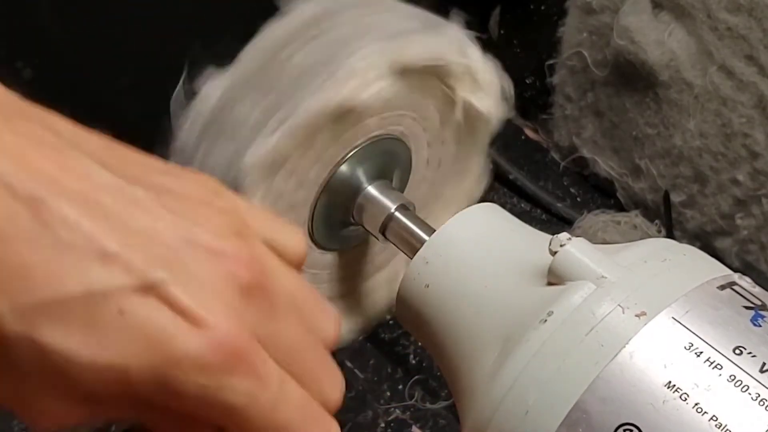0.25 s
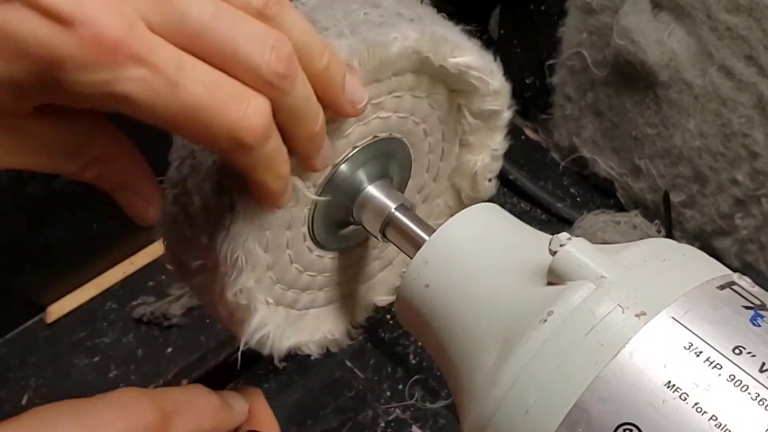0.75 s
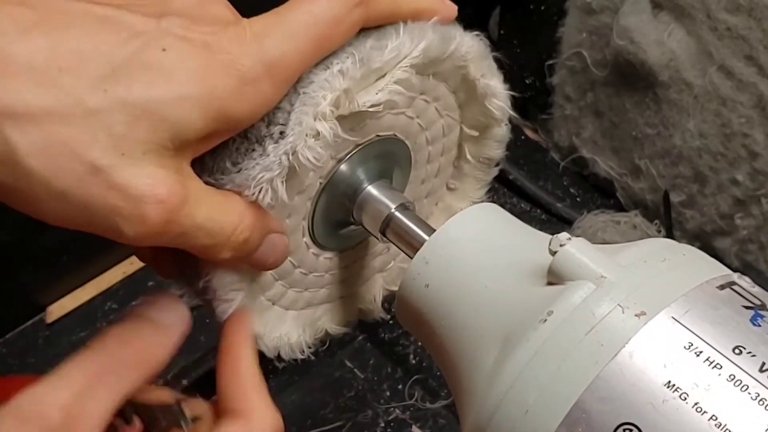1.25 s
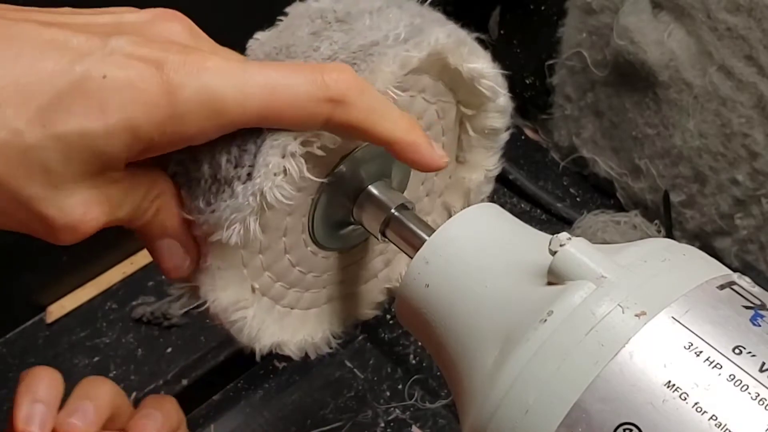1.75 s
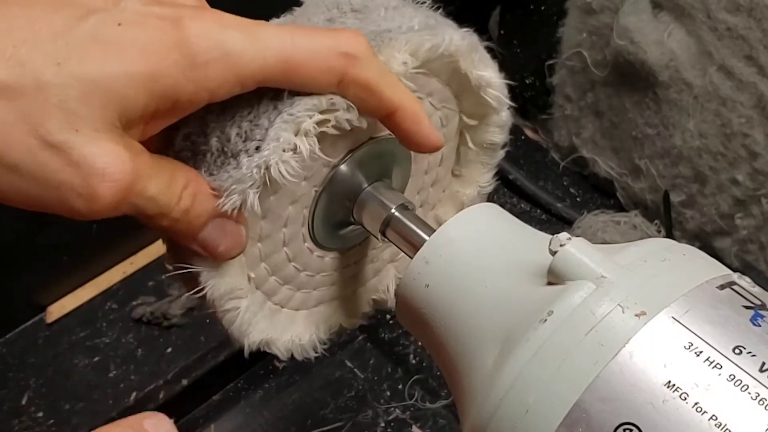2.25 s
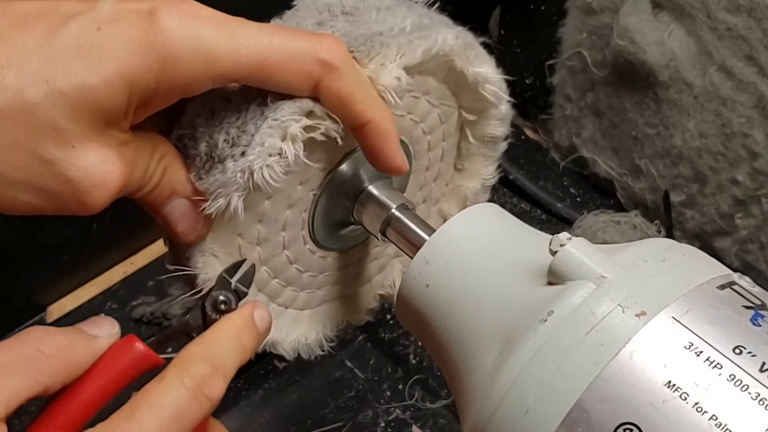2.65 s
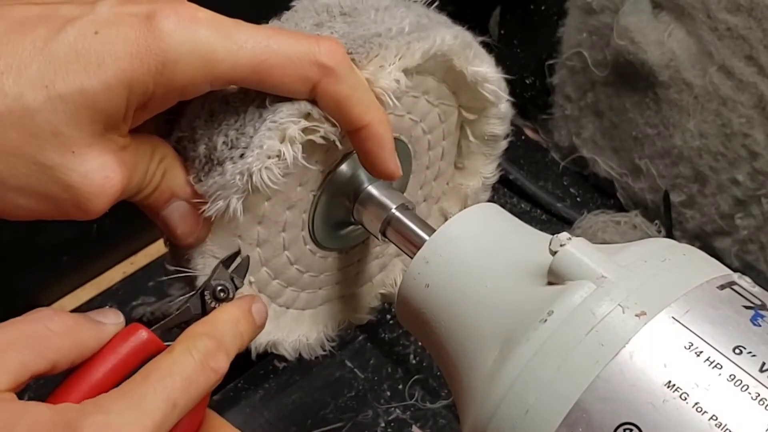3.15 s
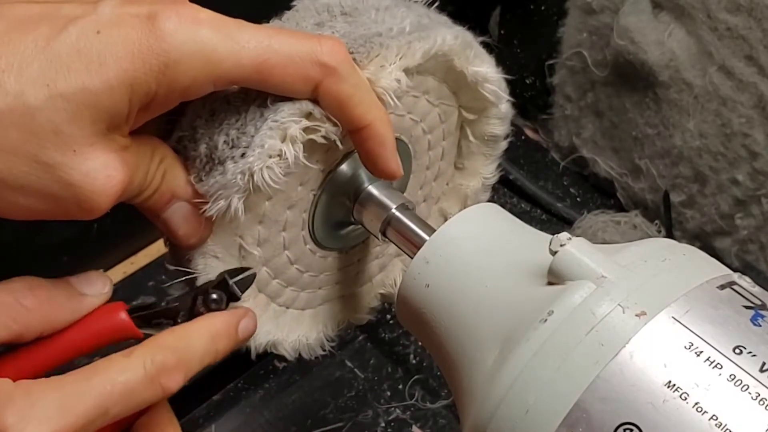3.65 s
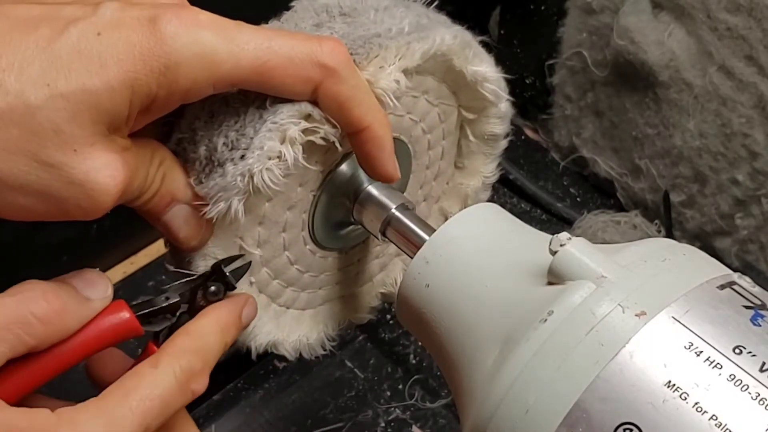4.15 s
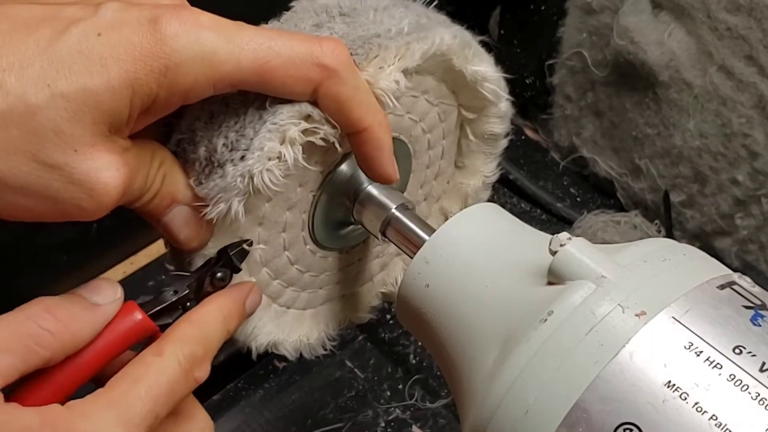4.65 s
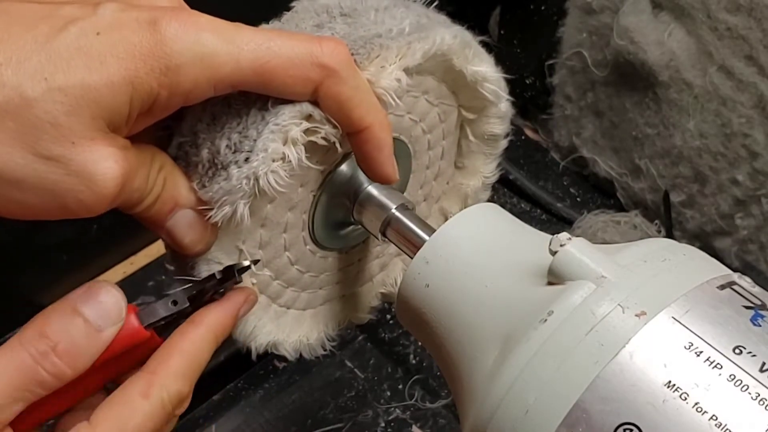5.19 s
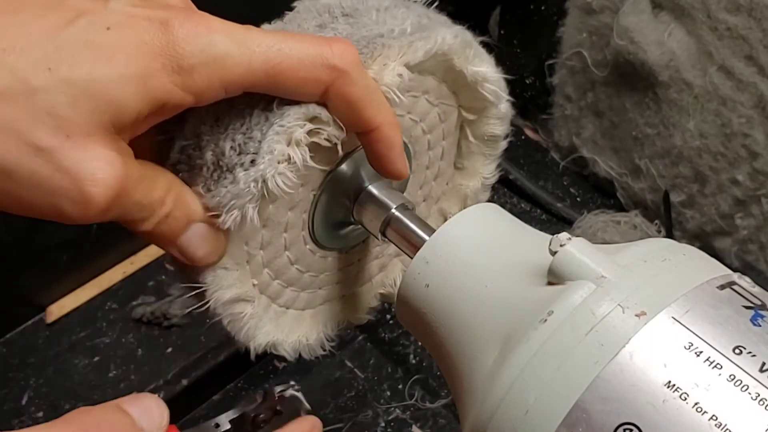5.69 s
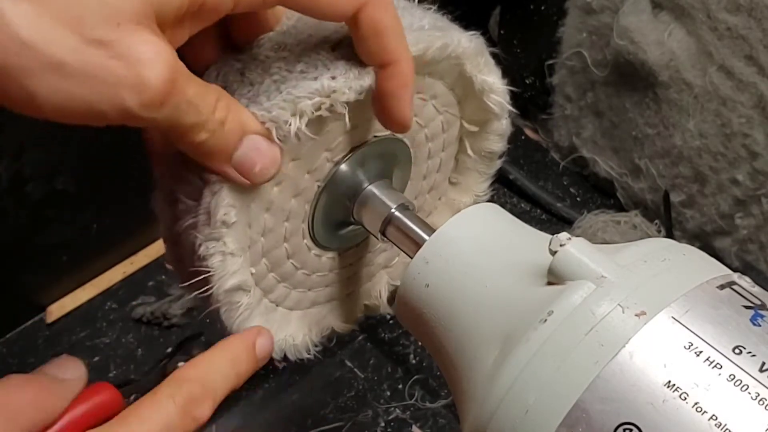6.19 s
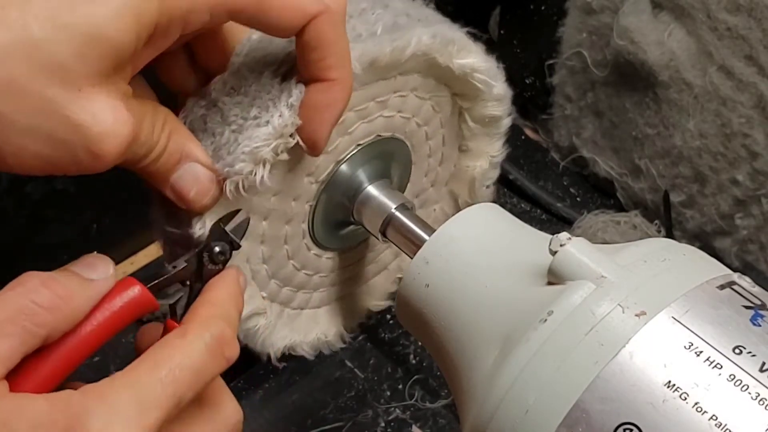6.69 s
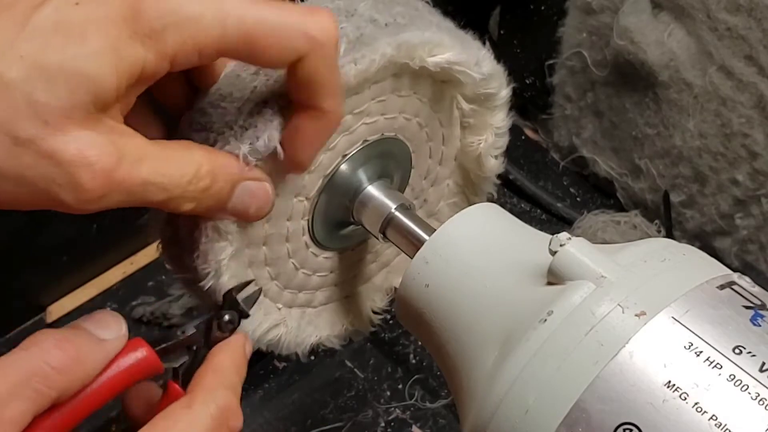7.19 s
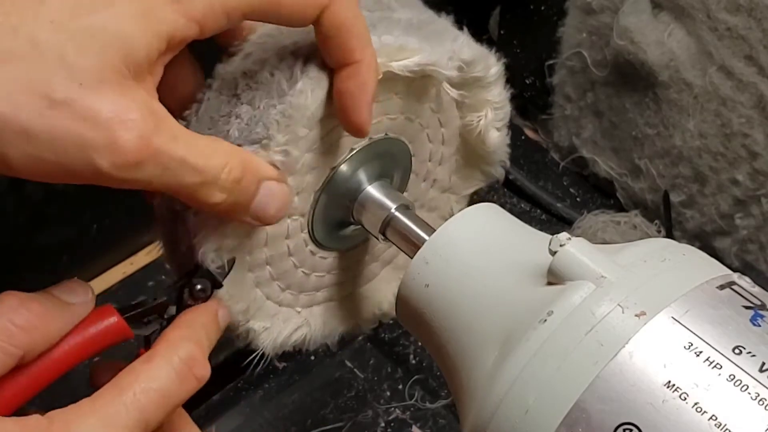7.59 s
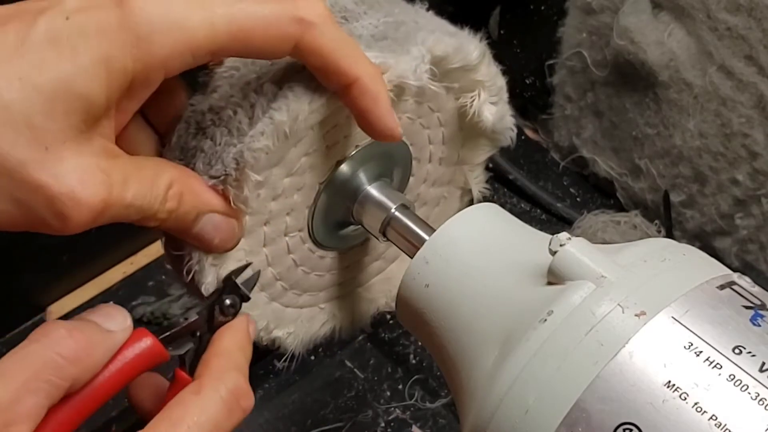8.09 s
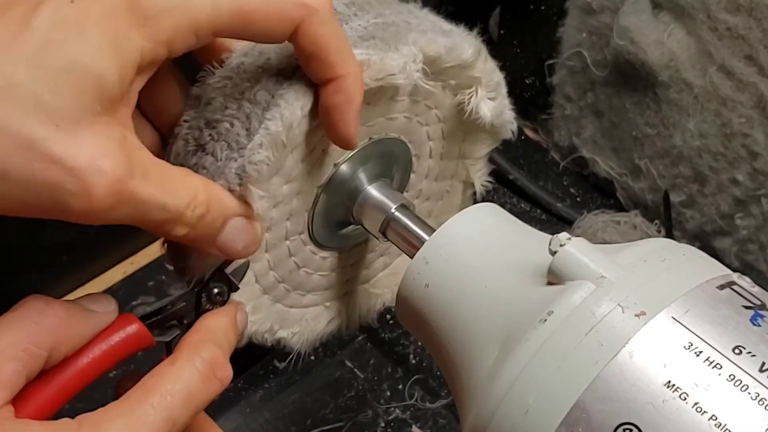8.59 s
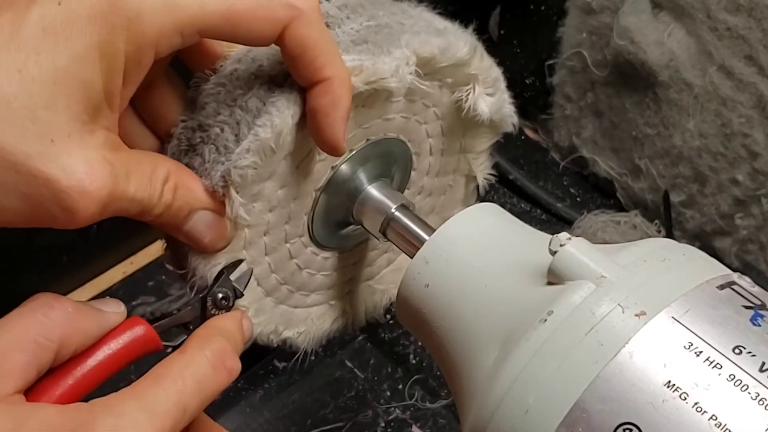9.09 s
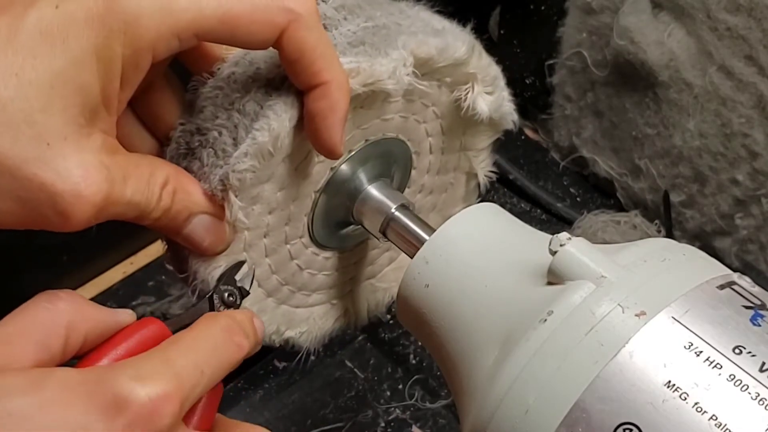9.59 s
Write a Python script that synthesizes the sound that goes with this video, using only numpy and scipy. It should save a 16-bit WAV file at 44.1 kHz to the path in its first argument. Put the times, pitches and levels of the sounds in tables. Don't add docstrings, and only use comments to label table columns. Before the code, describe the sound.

A gusty low machine hum runs throughout; one hard metallic snip rings out early, followed by a sleeve rustle and faint dull bumps.

```python
import sys
import numpy as np
from scipy import signal
from scipy.fft import rfft, irfft
from scipy.io import wavfile
from scipy.ndimage import uniform_filter1d

SR = 44100
rng = np.random.default_rng(int(sys.argv[2]) if len(sys.argv) > 2 else 0)


def voltage_ratio(decibels):
    exponent = np.asarray(decibels, float) / 20
    return 10 ** exponent


def wav_out(sig):
    wavfile.write(sys.argv[1], SR, np.round(np.clip(np.atleast_2d(sig).T, -1, 1) * 32767).astype(np.int16))


N = 433944
TIME = np.arange(N) / SR
HZ = np.maximum(np.fft.rfftfreq(N, 1 / SR), 1)
TOP_HZ = 15720

# f/Hz, density/dB per Hz
RUMBLE_SPECTRUM = [(22, -23), (34, -16), (42, -25), (50, 1.5), (58, -11), (66, 6.5), (72, -5), (80, 7),
                   (90, -3.5), (100, -4.5), (112, -9)]
# t/s, level over mean/dB, half-length/s
RUMBLE_SWELLS = [(.05, 5, .033), (.23, 10, 0.025), (.73, 4, 0.088), (1.06, 5, .04), (1.34, 4.5, 0.11),
                 (1.93, -4.9, .12), (2.14, 6.5, 0.036), (2.6, -5.9, .04), (3.04, -4, .064), (3.35, -5, .18),
                 (4.01, -1.5, .2), (4.49, 4, 0.022), (4.66, 9.5, 0.056), (4.96, 4.5, .04), (5.21, -8, 0.063),
                 (5.33, 7, 0.033), (5.76, -2.5, 0.18), (6.08, 6, 0.026), (6.22, 5, 0.16), (6.35, -4, .04),
                 (6.45, 6.5, .04), (6.76, -5, 0.13), (7.02, 2.5, .036), (7.14, -6, 0.033), (7.23, 6, .22),
                 (7.6, -5, .07), (7.85, 7, 0.033), (8.09, -5.9, 0.084), (8.93, 2.5, .18)]
# f/Hz, density/dB per Hz
AIR_SPECTRUM = [(95, -31), (112, -1), (150, -6.5), (205, -3), (250, -14.5), (300, -23), (450, -19.5),
                (800, -26), (1000, -23.5), (2000, -30), (4000, -40.5), (7000, -42), (8700, -50),
                (15800, -48.5)]
# f/Hz, width/Hz, level/dB
AIR_PEAKS = [(366.7, 116, 14), (482, 62, -4.5), (672, 123, 8.5), (1480, 110, -2), (3410, 1270, 4.5),
             (6340, 200, 6.5), (11900, 2850, 5.5), (14300, 900, 1)]
# t/s, level over mean/dB, half-length/s
BOOM_SWELLS = [(0.41, 3, .06), (0.61, 5.5, 0.092), (3.45, 6, 0.021), (3.86, 8, .06), (7.09, 5, 0.088),
               (9.34, 3, 0.11)]
# f/Hz, level/dB rms, left-right/dB
MAINS_LINES = [
    (120.3, -46, -3),
    (239, -55.5, 0),
]
# f/Hz, likeness/-1 to 1
LIKENESS = [(60, 1), (99, 0.99), (160, 1), (270, 0.88), (450, 0.88), (740, 0.2), (1220, -0.56),
            (2010, 0.15), (3330, -0.17), (5500, 0.033), (9080, -0.059), (15000, -0.012)]
# f/Hz, left-right/dB
ROOM_LEAN = [(60, -4), (110, -3.5), (200, -2), (380, -0.5), (700, -0.5), (1290, 0), (2380, -4.5),
             (4400, -4), (8120, -2.5), (15000, 5.5)]
# t/s, length/s, first f/Hz, last f/Hz, level/dB
SQUEAKS = [(.19, .05, 13600, 15100, -83), (.29, .15, 13800, 15300, -84), (.44, 0.18, 14700, 14800, -84),
           (.31, .07, 11900, 11800, -86), (.44, 0.2, 11800, 11900, -81), (5.52, .06, 12800, 12900, -84),
           (5.58, .07, 13900, 14050, -84), (5.64, .07, 14450, 13800, -82), (5.72, .1, 14300, 15500, -84),
           (5.73, .05, 11800, 11700, -85), (5.84, .09, 14200, 13700, -82), (5.94, .08, 13800, 11800, -85),
           (6.01, .06, 11700, 11800, -84), (8.29, .07, 12700, 14900, -82), (8.42, .08, 15600, 15250, -81),
           (8.55, .15, 11200, 13300, -81), (8.6, .1, 12500, 12800, -78), (8.69, .07, 12400, 11750, -80),
           (9.0, .11, 14900, 12300, -87)]
# f/Hz, density/dB per Hz
CLOTH_SPECTRUM = [(900, -30.5), (1500, -19), (2100, -3.5), (2900, -3), (3500, -11), (5200, -5.5),
                  (7300, -12), (8300, -8.5), (11700, -1.5), (12400, 0), (15800, 2.5)]
# t/s, peak level/dB, main f/Hz, second f/Hz, t60/s
BUMPS = [
    (0.999, -30.5, 220, 172, 0.079),
    (3.436, -33.5, 203, 179, 0.16),
    (3.826, -33, 163.4, 209, 0.16),
]
# f/Hz, density/dB per Hz
SCATTER_SPECTRUM = [(300, -30), (800, -5.5), (1500, -2), (3300, 2), (4300, -9), (6500, -9.5), (8500, -15),
                    (12000, -12), (15800, -18.5)]
# f/Hz, left-right/dB
SCATTER_LEAN = [(600, -10), (1000, -10), (1400, -6), (2000, -5.5), (2800, 3), (4200, -1), (9000, 1)]
# t/s, strike level/dB, contact cut f/Hz, crack level/dB
CONTACTS = [
    (1.46, -31, 3500, -60),
    (1.5252, -14, 14000, -26),
    (1.5257, -9, 9000, -23),
    (1.5263, 2, 15000, -13),
    (1.5281, -13, 7000, -28),
    (1.5303, -10, 7000, -29),
    (1.5342, -13, 5000, -35),
    (1.5405, -19, 4000, -44),
    (1.547, -20, 4000, -47),
]
# f/Hz, left level/dB, right level/dB, left t60/s, right t60/s
STEEL_MODES = [(800, -49, -33, .03, 0.035), (1180, -42, -42, .02, 0.036), (1410, -36, -30, 0.016, 0.055),
               (1580, -29, -29.5, 0.013, 0.026), (1790, -33, -28.5, .015, 0.024),
               (2100, -38.5, -34, .012, 0.032), (2570, -24, -32, 0.013, 0.023),
               (2900, -37, -27, 0.0077, 0.019), (3200, -25, -31, 0.014, 0.044),
               (3375, -26.5, -24.5, .014, .03), (3620, -29, -20.5, 0.012, 0.015),
               (4600, -35, -28, .008, 0.012), (7340, -31, -42, 0.0092, .01), (7950, -29, -48, .008, .01),
               (14250, -35, -50, .006, 0.0097)]
# f/Hz, left level/dB, right level/dB
CRACK_SPECTRUM = [(605, -40, -38), (1500, -4.5, 8.5), (3340, 1.5, 11.5), (4070, -10, -8.5),
                  (5560, -18, -13.5), (7600, -16, -17), (8900, -9, -19.5), (10180, -25, -20),
                  (12500, -11.5, -20), (14200, -9, -20), (15300, -16, -26), (15800, -29, -40),
                  (16600, -45, -50)]


def rms_one(x):
    return x / np.sqrt(np.mean(x ** 2) + 1e-20)


def at_hz(points):
    hz, value = np.transpose(points)
    return np.interp(np.log(HZ), np.log(hz), value, left=value[0], right=value[-1])


def colour(x, db):
    return irfft(rfft(x) * voltage_ratio(db), N)


def drift(rate_hz):
    return rms_one(colour(rng.standard_normal(N), -20 * np.log10(1 + (HZ / rate_hz) ** 2)))


def bell(t, half_s):
    return np.exp(-(t / half_s) ** 2)


def push(s, length_s):
    blow = bell(TIME - s, length_s)
    return blow / blow.sum()


def ring(clicks, hz, t60):
    r, w = voltage_ratio(-60 / (t60 * SR)), 2 * np.pi * hz / SR
    return signal.lfilter([0, np.sin(w)], [1, -2 * r * np.cos(w), r * r], clicks + 1e-18)


def lean(db):
    return db * np.array([[.5], [-.5]])


def diffuse(db, ripple_db=0):
    mid, side = rfft(rng.standard_normal((2, N)))
    alike = np.clip(at_hz(LIKENESS), -.999, .999)
    pair = np.sqrt(1 + alike) * mid + np.sqrt(1 - alike) * side * [[1], [-1]]
    ripple = uniform_filter1d(rng.standard_normal((2, len(HZ))), size=250)
    ripple = rms_one(uniform_filter1d(ripple, size=250))
    level_db = db + lean(at_hz(ROOM_LEAN)) + ripple_db * ripple * (HZ > 760)
    return rms_one(irfft(pair * voltage_ratio(level_db) * (HZ < TOP_HZ), N))


def swinging(rows):
    return sum(db * bell(TIME - s, half_s) for s, db, half_s in rows)


def swell(noise, level_db, size):
    own = uniform_filter1d(np.mean(noise ** 2, axis=0), size=size)
    return noise / np.sqrt(own + 0.12) * voltage_ratio(level_db)


def duct_rumble():
    steep_db = -90 * np.maximum(np.log2(HZ / 112), 0)
    return swell(diffuse(at_hz(RUMBLE_SPECTRUM) + steep_db), -42.5 + swinging(RUMBLE_SWELLS), size=4400)


def duct_air():
    peaks = sum(db / (1 + (2 * (HZ - hz) / width) ** 2) for hz, width, db in AIR_PEAKS)
    return at_hz(AIR_SPECTRUM) + peaks, (HZ > 126) & (HZ < 232)


def duct_boom():
    air, in_boom = duct_air()
    noise = diffuse(air - 100 * ~in_boom)
    return swell(noise, -49 + swinging(BOOM_SWELLS) + 1.27 * drift(3.), size=7000)


def air_rush():
    air, in_boom = duct_air()
    return voltage_ratio(-49 + 0.25 * drift(.5)) * diffuse(air - 100 * in_boom, ripple_db=1.96)


def mains_hum():
    hum = 0
    for hz, db, lean_db in MAINS_LINES:
        wave = np.sqrt(2) * np.sin(2 * np.pi * hz * TIME + .18 * drift(1.5))
        hum = hum + wave * voltage_ratio(db + 1.26 * drift(1.8) + lean(lean_db))
    return hum


def extractor():
    return duct_rumble() + duct_boom() + air_rush() + mains_hum()


def weave_squeaks():
    edge_db, waver_hz_per_s = 10, 1700
    out, flutter, waver = np.zeros(N), drift(90), drift(404)
    for s, length_s, first_hz, last_hz, db in SQUEAKS:
        way = np.clip((TIME - s) / length_s, 0, 1)
        pitch = first_hz + (last_hz - first_hz) * way + waver_hz_per_s * length_s * waver
        phase = 2 * np.pi * np.cumsum(pitch) / SR
        level_db = db + 11.0 - edge_db * (2 * way - 1) ** 2 + 3.5 * flutter
        out += np.sin(phase) * (way > 0) * (way < 1) * voltage_ratio(level_db)
    return out


def fibre_hiss():
    brush_s, hold_s, rise_db_per_s, fall_db_per_s = 1.654, 0.037, 480, 429.5
    t = TIME - brush_s
    brush_db = -38.5 + rise_db_per_s * np.minimum(t, 0) - fall_db_per_s * np.maximum(t - hold_s, 0)
    drag = voltage_ratio(-70) * bell(TIME - .45, .17)
    fibres = rng.standard_normal(N) * voltage_ratio(1.8 * drift(150) + .6 * drift(40))
    return rms_one(colour(fibres, at_hz(CLOTH_SPECTRUM))) * (voltage_ratio(brush_db) + drag)


def sleeve():
    near = colour(fibre_hiss() + weave_squeaks(), -80 * (HZ > TOP_HZ))
    far = colour(np.roll(near, 20), -9 - 11.5 * np.log2(1 + HZ / 2500))
    return np.array([near, far])


def bumps():
    out = np.zeros(N)
    for s, db, hz, hz2, t60 in BUMPS:
        main = ring(push(s + 0.00353, .0008), hz, t60)
        second = ring(push(s + 0.0048, 0.00098), hz2, t60)
        out += voltage_ratio(db) * (main + 0.44 * second)
    return out * voltage_ratio(np.array([[-1.], [1.]]))


def thud():
    t = TIME - 1.066
    level = voltage_ratio(-26.5 + np.array([[-1.8], [1.8]]))
    return np.cos(2 * np.pi * 70.5 * (t - .004)) * bell(t, 0.018) * level


def scatter_gain():
    shut_s, rise_s, slide_s = 1.5245, .006, 1.455
    t = TIME - shut_s
    after = np.maximum(t - rise_s, 0)
    lead_in = voltage_ratio(-52 + 600 * np.minimum(t, 0))
    slide = (voltage_ratio(-64) + lead_in) * np.clip((TIME - slide_s) / .015, 0, 1) * (t < rise_s)
    flash = voltage_ratio(-31.5 - 60 * after / 0.056)
    tail = voltage_ratio(-42 - 150 * after - 498 * np.maximum(t - .05, 0))
    return slide + np.clip(t / rise_s, 0, 1) ** 2 * np.hypot(flash, tail)


def scatter():
    noise = diffuse(at_hz(SCATTER_SPECTRUM) + lean(at_hz(SCATTER_LEAN)), ripple_db=1.2)
    return noise * scatter_gain() * voltage_ratio(1.8 * drift(120))


def steel_ring():
    span = slice(round(1.4 * SR), round(1.9 * SR))
    luck = rng.standard_normal((len(CONTACTS), len(STEEL_MODES), 2))
    out = np.zeros((2, N))
    for (s, db, cut_hz, _), chance in zip(CONTACTS, luck):
        click = voltage_ratio(db) * (np.arange(N)[span] == round(s * SR))
        click = signal.lfilter(*signal.butter(1, min(cut_hz, 20000), fs=SR), click)
        for k, ((hz, *sides), each) in enumerate(zip(STEEL_MODES, chance)):
            flips = k % 3 == 2 and hz > 2000
            for side in (0, 1):
                height = voltage_ratio(sides[side] + 1.6 * each[side]) * (-1) ** (side * flips)
                out[side, span] += ring(click, hz, sides[side + 2]) * height
    body = signal.butter(2, [800, 15500], "band", fs=SR, output="sos")
    out[:, span] = signal.sosfilt(body, out[:, span])
    return out


def contact_cracks():
    burst = np.zeros(N)
    for s, _, _, crack_db in CONTACTS:
        decay_db = -60 * np.maximum(TIME - s, 0) / .008
        burst += voltage_ratio(crack_db + decay_db) * (TIME >= s) * (TIME < 1.9)
    white = rng.standard_normal(N)
    hz, *sides = np.transpose(CRACK_SPECTRUM)
    pair = [rms_one(colour(np.roll(white, 12 * k), at_hz(np.transpose([hz, db])))) for k, db in enumerate(sides)]
    return burst * pair


def bench_knock():
    knock_hz = 516
    swelling = ring(push(1.5264, .0003), knock_hz, .016)
    return voltage_ratio(-57) * ring(swelling, knock_hz, .064)


def snips():
    return steel_ring() + contact_cracks() + bench_knock() + scatter()


def scene():
    return extractor() + thud() + bumps() + snips() + sleeve()


def low_pass(x):
    return signal.sosfilt(signal.butter(12, 16830, fs=SR, output="sos"), x)


def record(dry):
    return low_pass(dry)


dry = scene()
out = record(dry)
wav_out(out)
```